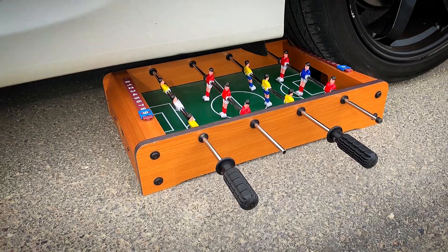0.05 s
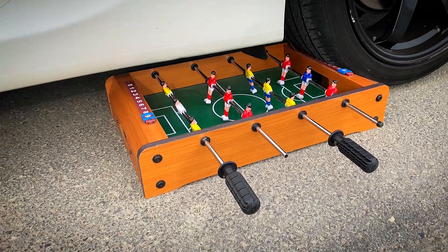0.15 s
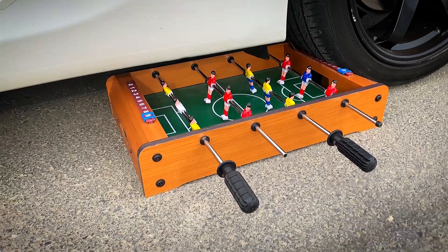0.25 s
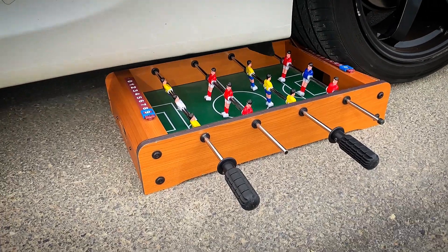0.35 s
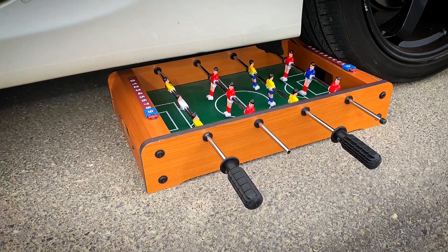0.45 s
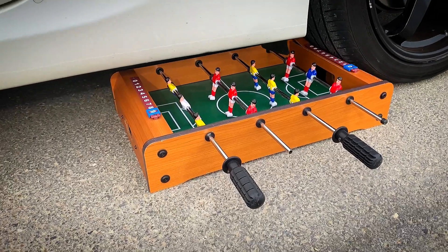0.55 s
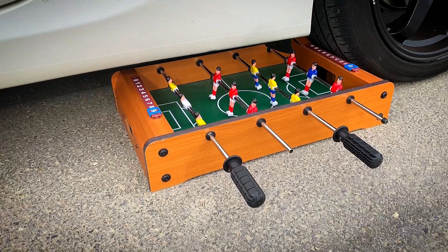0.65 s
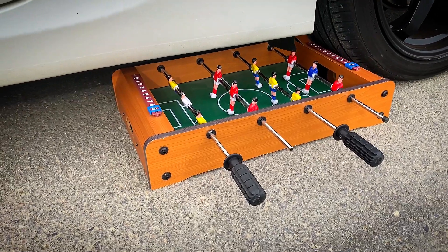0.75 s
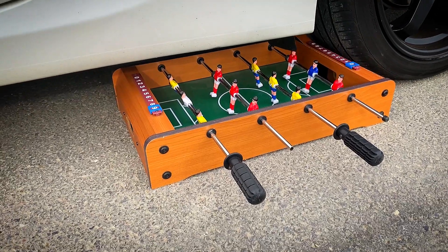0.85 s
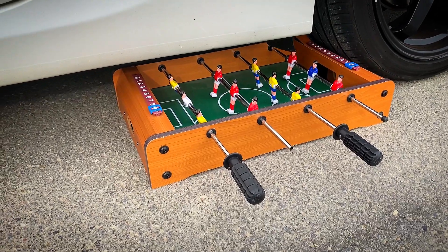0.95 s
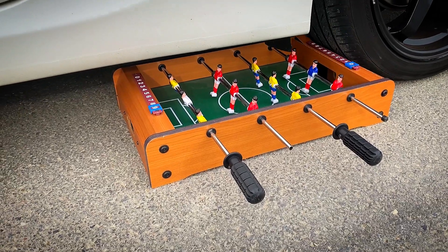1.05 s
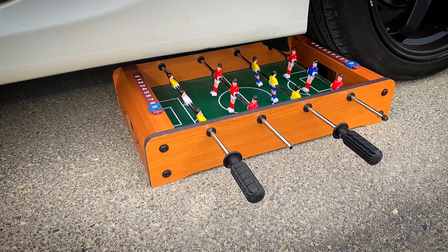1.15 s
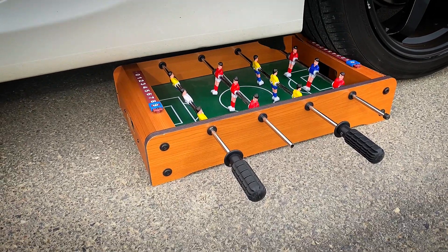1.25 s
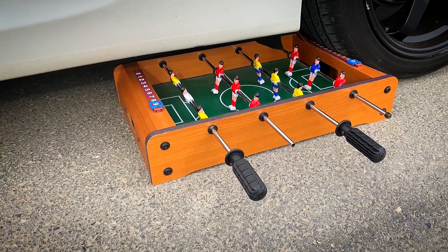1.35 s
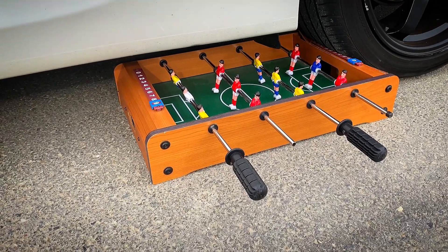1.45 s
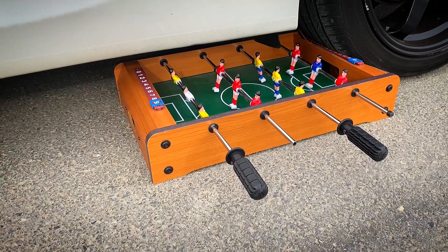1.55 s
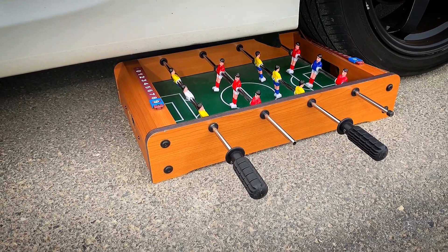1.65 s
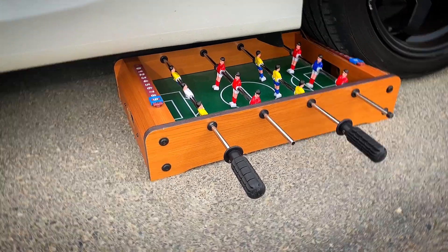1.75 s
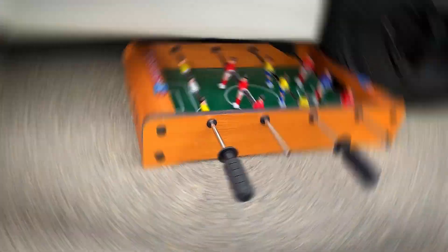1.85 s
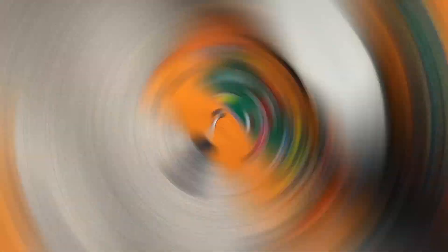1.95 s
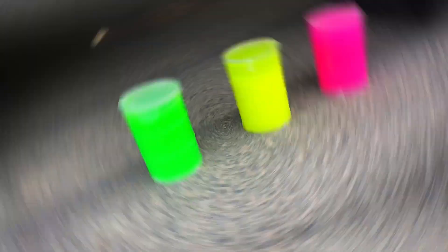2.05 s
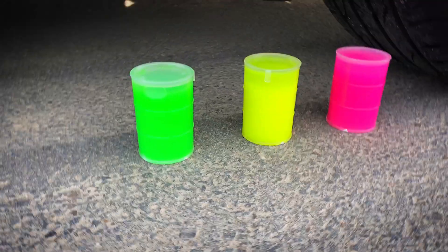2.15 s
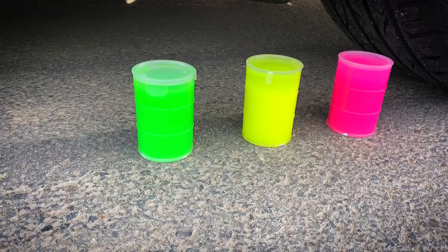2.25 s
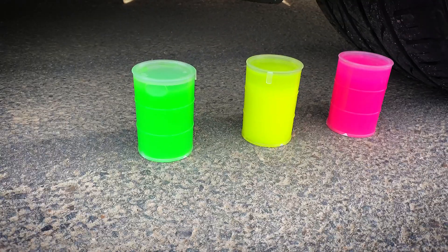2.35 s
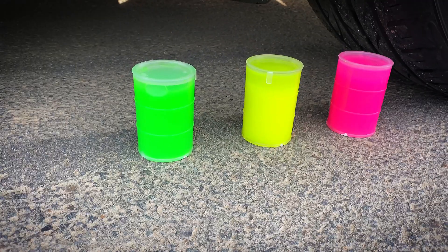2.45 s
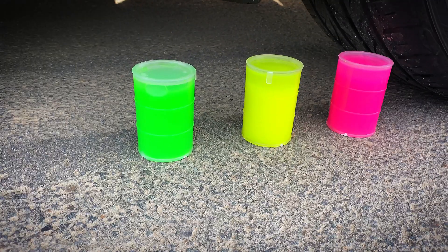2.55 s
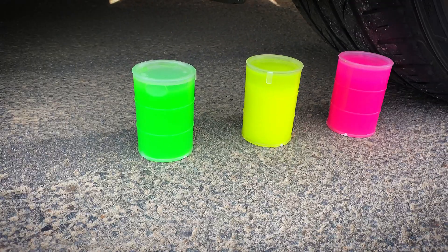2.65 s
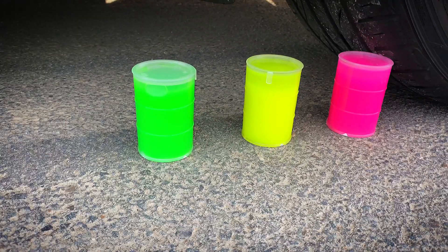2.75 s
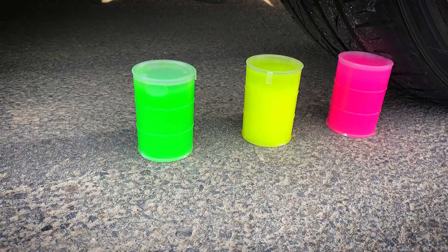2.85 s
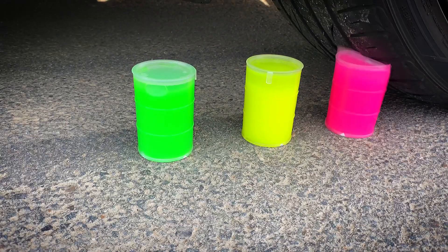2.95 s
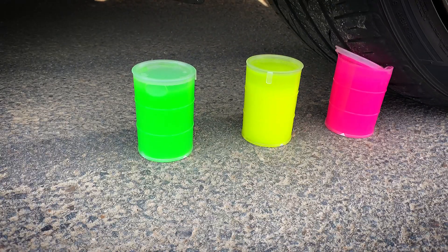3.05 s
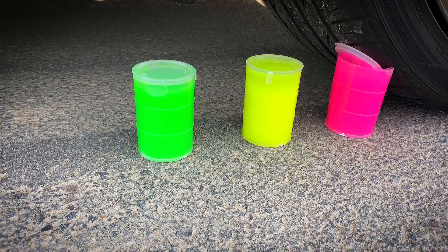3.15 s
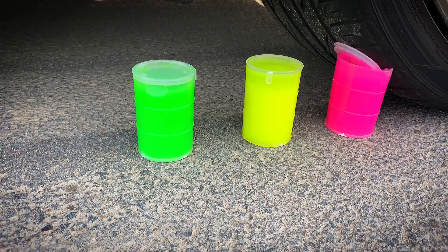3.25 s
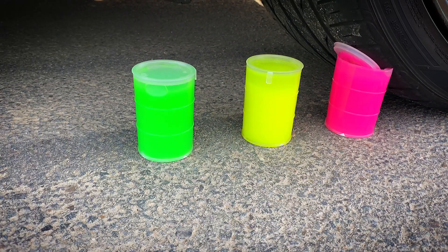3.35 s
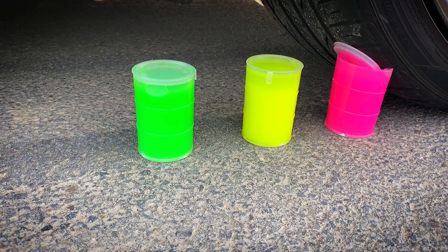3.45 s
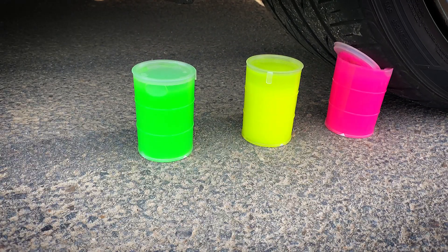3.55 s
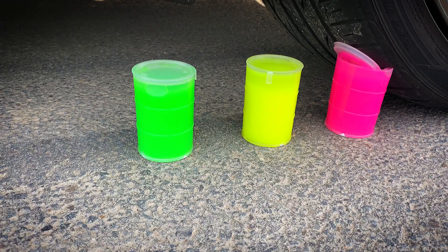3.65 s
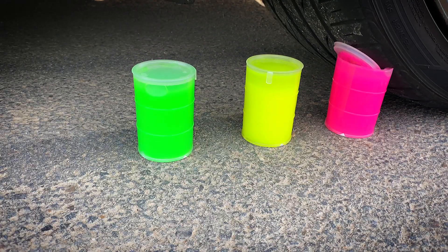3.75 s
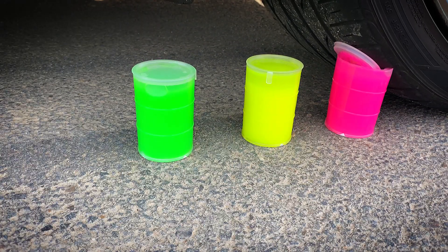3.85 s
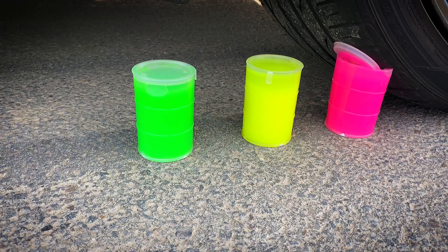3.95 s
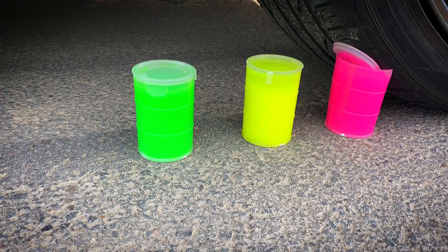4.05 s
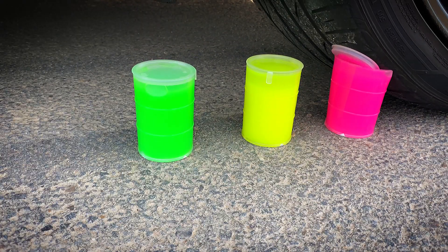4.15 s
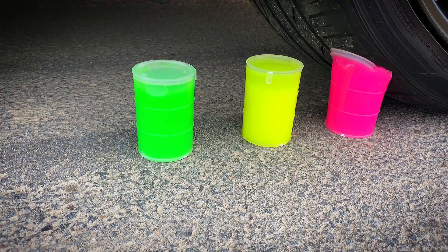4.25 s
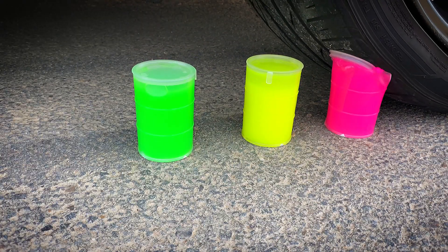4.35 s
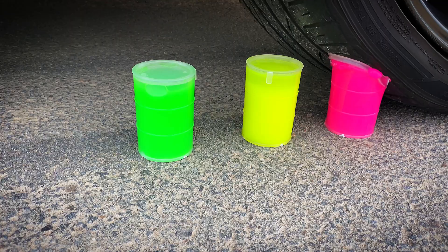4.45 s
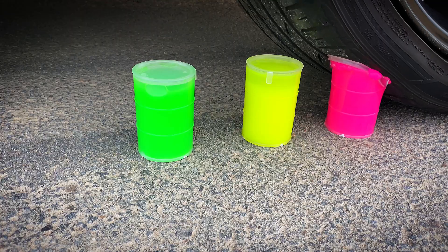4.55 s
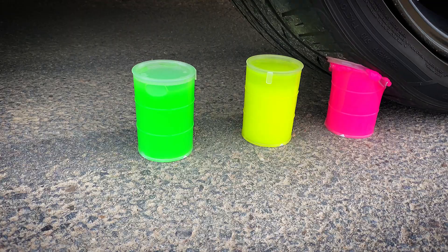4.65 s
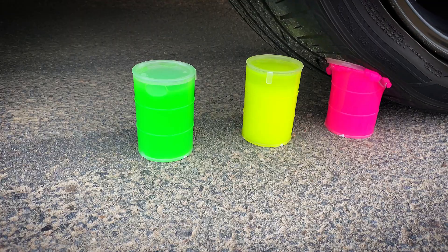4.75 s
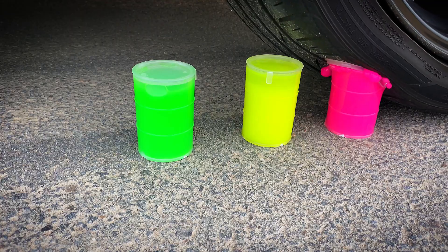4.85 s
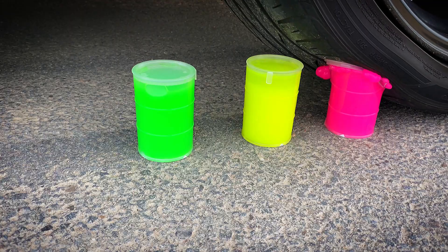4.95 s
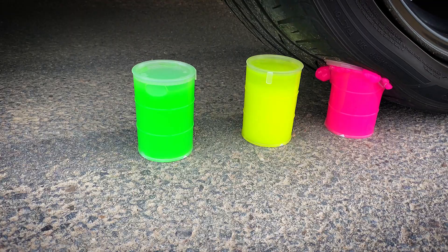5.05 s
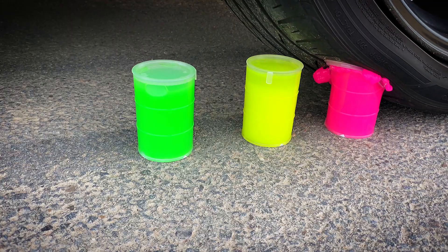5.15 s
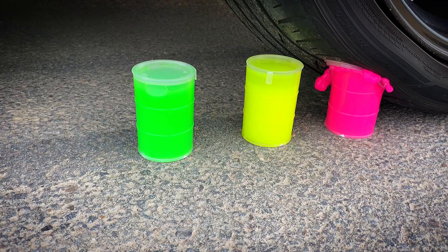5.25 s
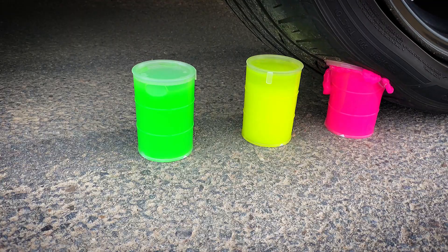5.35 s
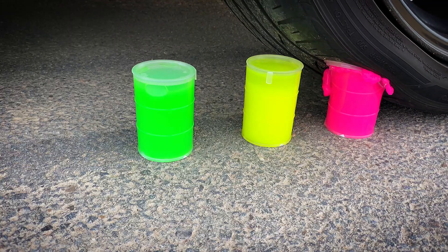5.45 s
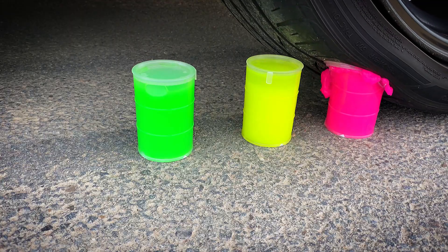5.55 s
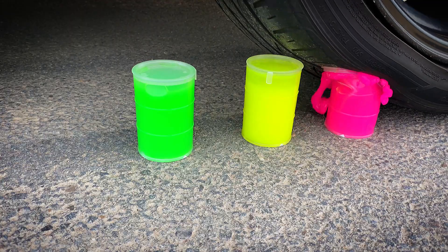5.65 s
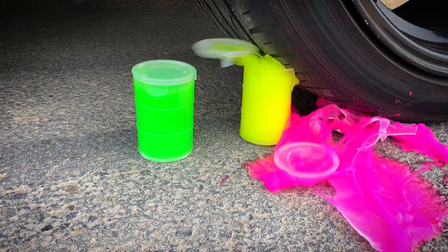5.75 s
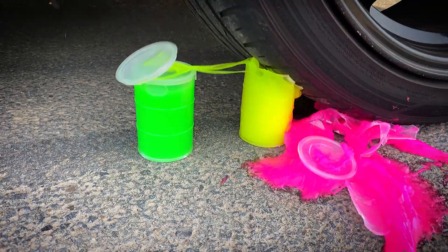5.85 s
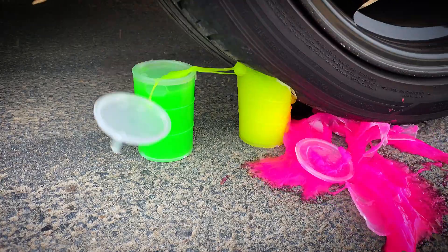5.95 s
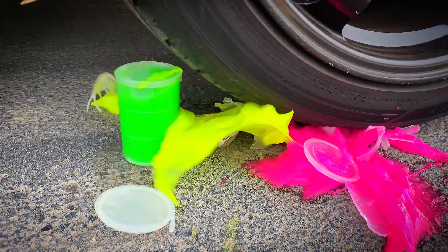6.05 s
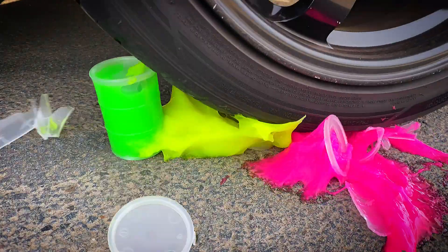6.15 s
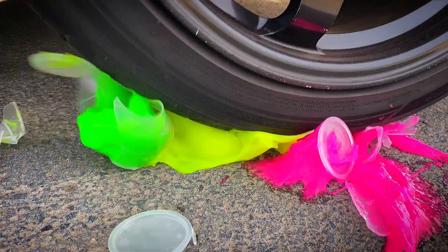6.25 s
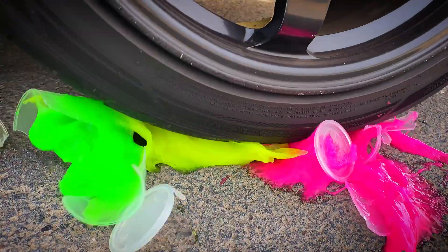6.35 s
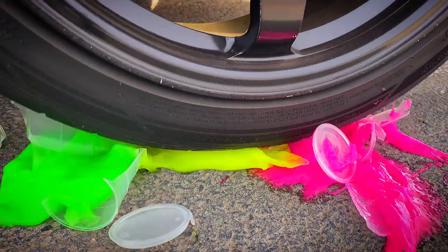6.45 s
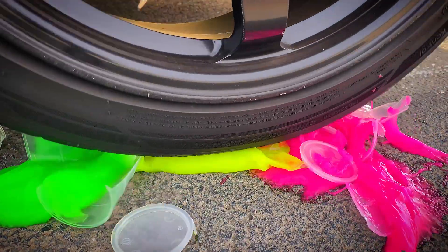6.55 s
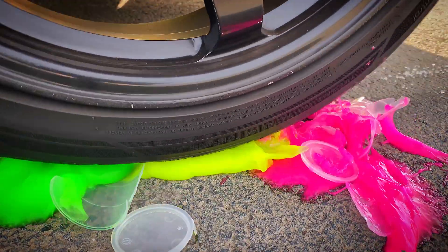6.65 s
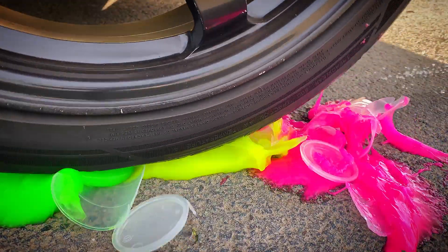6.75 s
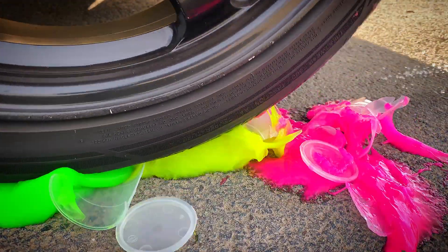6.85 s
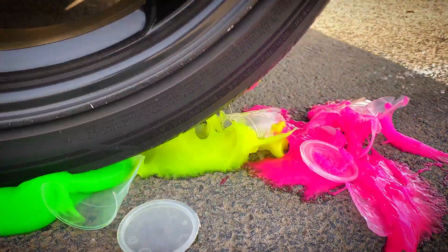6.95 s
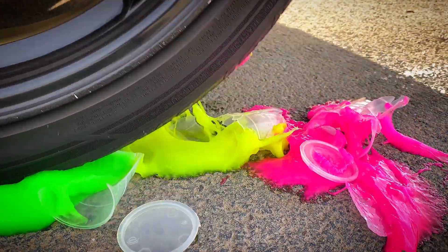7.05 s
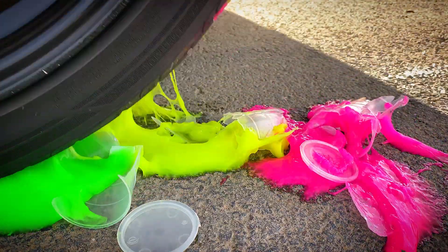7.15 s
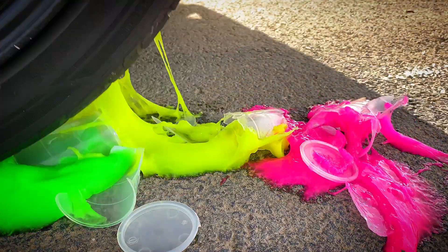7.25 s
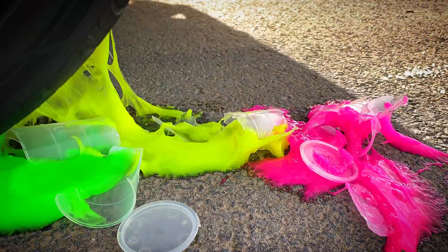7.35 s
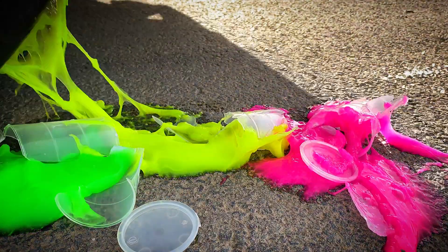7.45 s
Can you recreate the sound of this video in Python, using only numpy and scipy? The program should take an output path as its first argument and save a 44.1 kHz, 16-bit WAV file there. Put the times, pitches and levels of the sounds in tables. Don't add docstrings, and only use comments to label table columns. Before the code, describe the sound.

Very close, dry outdoor sound at asphalt level beside a car tyre. At 0 s a loud wooden crack hits over a low, throbbing idle with faint rattle and hiss; tiny ticks and a hollow knock follow until 0.5. A sharp click at 1.4 leads to another big crack at 1.5. The sound fades to nothing at 2 and rises again with a faster engine hum. Around 2.7-2.9 a plastic lid snaps and folds with a small leak. The engine revs up to about 4.1, with dull creaks at 4.2, then settles by 5. From 5.6 the first tub cracks and bursts, air slamming the microphone into clipping; the second pops hugely at 5.97, the third crunches from 6.16 to 6.6 with wet spurts. Small plastic crackles and slimy spits, mostly around 7.1, scatter over the slowing engine until an abrupt stop near 7.5.

```python
import sys
import numpy as np
from scipy import signal
from scipy.fft import rfft, irfft, next_fast_len
from scipy.io import wavfile
from scipy.ndimage import uniform_filter1d

SR = 44100
rng = np.random.default_rng(int(sys.argv[2]) if len(sys.argv) > 2 else 0)


def dump_mix(stems):
    frames = np.atleast_2d(stems).T
    limited = np.clip(frames, -1, 1)
    pcm = np.round(limited * 32767).astype(np.int16)
    wavfile.write(sys.argv[1], SR, pcm)


def volts(x):
    e = np.asarray(x, float) / 20
    return 10 ** e


N = 330309
CUT_S = 1.99
PIPE_SPREAD = 0.9


def level(x):
    return x / np.sqrt(np.mean(x ** 2))


def walk(rate):
    hold = int(SR / rate)
    steps = np.repeat(rng.standard_normal(N // hold + 1), hold)
    return 1.37 * uniform_filter1d(uniform_filter1d(steps, hold), hold)[:N]


def coloured(spectrum):
    hz, db = np.transpose(spectrum)
    size = next_fast_len(N)
    f = np.fft.rfftfreq(size, 1 / SR)
    gain = volts(np.interp(np.log(f + 1), np.log(hz), db, left=-90, right=-90))
    return level(irfft(rfft(rng.standard_normal(N), size) * gain)[:N])


def band(x, lo_hz, hi_hz):
    return signal.sosfilt(signal.butter(2, [lo_hz, min(hi_hz, 0.45 * SR)], "band", fs=SR, output="sos"), x)


def breakage(noise, ring_hz, treble_db):
    # ratio to ring_hz, level_db
    wall_modes = [(0.998, 6.5), (1.599, 0.5), (2.35, -6.5), (3.4, -25.5)]
    top_hz = np.clip(7000 * volts(0.35 * treble_db), 2600, 7000)
    shard_hz = rng.uniform(0.19, 0.9) * top_hz
    snap = level(band(noise[0], 650, top_hz))
    snap += 0.27 * level(band(noise[0], 0.9 * shard_hz, 0.97 * shard_hz))
    treble = level(band(noise[1], 5900, 14400))
    ring = 0
    for ratio, db in wall_modes:
        mode_hz = ratio * ring_hz
        ring = ring + volts(db) * level(band(noise[2], 0.792 * mode_hz, 1.18 * mode_hz))
    return level(snap), treble, level(ring)


def breaks():
    # start_s, level_db (peak), ring_hz, ring_db (over the crack), t60_s
    game = [
        (0.009, 1, 524, -3.5, 0.06),
        (0.2659, -44, 660, -20, 0.015),
        (0.3793, -21, 890, 0, 0.023),
        (0.4583, -34, 513, 22, 0.0074),
        (1.3893, -17, 4640, -3, 0.004),
        (1.4876, -9.5, 747, 2.5, 0.028),
    ]
    lid = [
        (2.7264, -28, 412, 3, 0.0063),
        (2.866, -2, 1098, 3, 0.012),
        (2.8789, -3.5, 1153, -4, 0.017),
        (2.8892, -9, 1120, 3.5, .0062),
        (2.9321, -2.5, 576, 8, .02),
        (4.1486, -33, 455.2, 18, 0.019),
        (4.202, -28.5, 447, 8, 0.019),
        (4.2268, -29.5, 396, -10, 0.023),
        (4.5714, -38.5, 1748, -2, 0.0091),
        (4.5781, -38.5, 1764, 10.5, 0.01),
    ]
    first_tub = [(5.5617, -2.5, 563, 4.5, .007), (5.5886, -10.5, 600, 12.5, .0088),
                 (5.6104, -7, 600, 9.5, .005), (5.6678, -17.5, 1124, 10, .0044), (5.6763, 9, 354, 5.5, .04),
                 (5.6869, 5, 844, 6.5, .018), (5.6929, 1.5, 700, -11, .0059), (5.7092, 8, 893, 10.5, .0091),
                 (5.7198, -2, 730, -3, 0.0061), (5.761, -2.5, 653, -7, .025),
                 (5.7802, -25.5, 660, -11, .029), (5.8032, -21.5, 896, -9, .019),
                 (5.8199, 5, 1036, 2.5, .004), (5.8413, -16.5, 2263, -3.5, .0077),
                 (5.8637, -24.5, 400, 10.5, .0088), (5.8715, -19.5, 1050, 2, .012)]
    second_tub = [(5.9338, -25.5, 1366, 18, 0.016), (5.9381, -18.5, 1674, 4.5, 0.016),
                  (5.966, 23.5, 830, 1, 0.0088), (5.9823, 14.5, 443, 6.5, 0.0046),
                  (5.9916, -15.5, 400, 7, 0.049), (6.0019, -22, 660, -1, 0.025),
                  (6.0358, -24.5, 2240, 11.5, 0.007), (6.0447, -20, 1437, 7, 0.043),
                  (6.0987, -22, 1796, -2, .018), (6.1129, -25, 2230, -10, .0071),
                  (6.143, -30, 894, 6, 0.0098)]
    third_tub = [(6.1645, 0.5, 888, 0.5, 0.055), (6.196, 4.1, 660, -9.5, 0.03),
                 (6.2356, -5.7, 957, -0.5, 0.022), (6.252, -8.5, 2200, -7.5, 0.0055),
                 (6.2624, 3.5, 1160, 2.5, 0.0049), (6.2913, -12.5, 742.7, 1.5, 0.0083),
                 (6.335, -33, 2500, -3, .006), (6.307, -17, 1157, -6.5, 0.018),
                 (6.3505, -16, 1640, 12.5, 0.0035), (6.3815, -18, 1941, -16, .012),
                 (6.3904, -1, 1340, 2, 0.014), (6.4227, -30, 1964, 24.5, 0.003),
                 (6.4396, -19, 1890, 16.5, .0056), (6.4465, -24, 1334, -0.5, .032),
                 (6.4579, -10, 1323, 9.5, 0.013), (6.4788, -22.5, 886, 8, 0.02),
                 (6.496, -23, 1250, 13.5, .0074), (6.51, -3.5, 1128, -5, 0.03),
                 (6.5355, -1.1, 1210, 10.5, 0.0034), (6.5644, -24, 1850, 0, 0.0038),
                 (6.5793, -15, 1890, -0.8, 0.0044)]
    shards = [(6.6552, -21.5, 2300, 5.5, 0.0092), (6.6683, -31, 2000, -4.7, .076),
              (6.703, -20, 2570, -20, 0.0045), (6.7095, -33.5, 1310, 12, 0.02),
              (6.7298, -30.5, 1180, 1, .008), (6.7556, -26.5, 980, -5.5, 0.018),
              (6.803, -20.5, 2330, -24, 0.0087), (6.8238, -34.5, 2252, -11, 0.012),
              (6.8294, -37, 463, 14.5, 0.017), (6.841, -27, 600, -10, 0.02), (6.8824, -25, 2140, -21, 0.02),
              (6.992, -35, 2110, 6, .011), (6.9503, -38, 440, 1.2, .012), (7.0024, -37, 1320, 9.5, 0.014),
              (7.055, -42, 1205, 24, 0.031), (7.061, -27.5, 910, 16, 0.044), (7.068, -22, 1190, 4, .0044),
              (7.077, -29, 1670, 9, 0.013), (7.153, -22, 482, 16.5, 0.017),
              (7.177, -30.5, 660, 16.5, 0.015), (7.2114, -33.5, 1302, 10.5, 0.013),
              (7.277, -53, 7000, 16.5, .006), (7.3379, -55, 7040, 17, .006)]
    # breaks, treble_db over the crack, treble lost per dB of ring, treble lost per dB of weakness
    materials = [(game, -7.5, 0.35, 0.034), (lid, -5, 0.2, 0.05), (first_tub, -0.027, 0.05, 0.05),
                 (second_tub, -2.5, 0.3, 0.05), (third_tub, -8, 0.8, 0.42), (shards, -10.5, 0.13, 0.045)]
    found = []
    for rows, base_db, lost, won in materials:
        for start_s, db, ring_hz, ring_db, t60_s in rows:
            treble_db = base_db - lost * ring_db + won * min(db, 0)
            found.append((start_s, db, ring_hz, ring_db, t60_s, treble_db))
    return found


def cracks():
    out = np.zeros(N + SR)
    t = np.arange(SR // 8) / SR
    slump_s = 0.02
    sliding_hz = 150 + (400 - 150) * np.exp(-t / slump_s)
    slump = np.sin(2 * np.pi * np.cumsum(sliding_hz) / SR) * np.exp(-t / slump_s)
    tyre_hz, tyre_t60_s = 222, 0.12
    tyre_ring = np.sin(2 * np.pi * tyre_hz * t) * np.exp(-np.log(1000) * t / tyre_t60_s)
    for start_s, db, ring_hz, ring_db, t60_s, treble_db in breaks():
        noise = rng.standard_normal((5, len(t)))
        snap, treble, ring = breakage(noise, ring_hz, treble_db)
        fall = np.log(1000) * t / np.clip(t60_s, 0.004, 0.12)
        splinters = volts(7.4 * uniform_filter1d(noise[3], 30) * np.minimum(t / 0.009, 1))
        decay = np.exp(-fall) + np.exp(-t / 0.00049) + volts(-41) * np.exp(-0.3 * fall)
        bright = (snap + volts(treble_db) * treble * np.exp(-0.6 * fall)) * splinters * decay
        thud = volts(-6.5 + 0.23 * db) * level(band(noise[4], 140, 480))
        swell = 1 - np.exp(-t / 0.00026)
        hollow = (ring + thud) * volts(ring_db - 0.1) * np.exp(-0.65 * fall) * swell
        low = volts(-18 + 0.84 * min(db, 0)) * tyre_ring
        if db > 5:
            low = low + volts(-24.5) * slump
        i = int(start_s * SR)
        out[i:i + len(t)] += volts(db - 1.0) * (bright + hollow + low * (start_s > CUT_S))
    return out[:N]


def squirts():
    # start_s, length_s, level_db, ring_hz, ring_db (over the squirt)
    spurts = [
        (2.89, .045, -36.5, 990, -0.5),
        (5.777, 0.022, -39.5, 907, 0),
        (5.813, 0.021, -29.5, 885, -13.5),
        (5.911, 0.037, -29.5, 1680, -18),
        (6.19, .016, -21.5, 777, 7.5),
        (7.079, .026, -48.5, 1060, 26),
        (7.106, 0.011, -27, 1364, 12),
        (7.11, 0.0076, -34.5, 1020, 16),
        (7.145, 0.017, -27, 835, 10.5),
    ]
    out = np.zeros(N + SR)
    treble_db = 2.6
    for start_s, length_s, db, ring_hz, ring_db in spurts:
        i, count = int(start_s * SR), int(length_s * SR)
        snap, treble, ring = breakage(rng.standard_normal((3, SR // 8)), ring_hz, treble_db - 7.5)
        spray = snap + volts(treble_db) * treble + volts(ring_db) * ring
        out[i:i + count] += volts(db) * signal.windows.tukey(count, 0.6) * spray[:count]
    return out[:N]


def underbody(x, t60_s=0.071, wet_db=-18):
    bounce_s, bounce = 0.000242, 0.13
    x = x + bounce * np.interp(np.arange(N) - bounce_s * SR, np.arange(N), x)
    t = np.arange(SR // 4) / SR
    tail = band(rng.standard_normal(len(t)), 340, 3600)
    tail = tail * np.exp(-np.log(1000) * t / t60_s) * (t > 0.003)
    return x + volts(wet_db) * signal.fftconvolve(x, tail / np.sqrt(np.sum(tail ** 2)))[:N]


def controls():
    idle_drive = [
        (0.12, 26.05, 0.5),
        (0.58, 24.96, -1),
        (1.45, 25.3, -1.2),
        (1.99, 25.67, 2.5),
    ]
    creep_drive = [(1.99, 35.27, 0.5), (2.571, 40.57, -2.5), (3.55, 42.16, -2.5), (3.671, 41.4, 0.5),
                   (3.81, 46.4, 4), (3.98, 55.24, 6.5), (4.122, 59.35, 2.5), (4.3, 57.38, -1.6),
                   (4.6, 46.1, -1.3), (4.77, 39.5, -4.5), (4.94, 33.38, 0), (5.099, 32.62, 2.5),
                   (5.618, 39.3, 3.5), (5.999, 41.96, 3), (6.396, 39.74, -1.5), (6.619, 35.2, -3.5),
                   (6.992, 29.39, -3.5), (7.49, 24.2, -7)]
    # order, idle_db, creep_db (over the pipe), dB gained per dB of load
    main_orders = [(1, -34.5, 3.6, 0.65), (2, -45, 0.25, 1.44), (3, -33.5, -1.1, 1.61), (4, -25.5, -0.4, 2)]
    # pitch_hz, level_db
    tailpipe = [(28, -46), (44, -26.5), (60, -30), (82, -13.5), (120, -27.5), (145, -24), (175, -27),
                (240, -54.5)]
    t = np.arange(N) / SR
    idle = t < CUT_S

    def follow(drive):
        start_s, firing_hz, load_db = np.transpose(drive)
        return np.array([np.interp(t, start_s, firing_hz), np.interp(t, start_s, load_db)])

    hz, load = np.where(idle, follow(idle_drive), follow(creep_drive))
    pipe_hz, pipe_db = np.transpose(tailpipe)
    order_db = []
    for k, (_, idle_db, creep_db, share) in enumerate(main_orders, 1):
        boom_db = np.interp(np.log(k * hz), np.log(pipe_hz), pipe_db)
        order_db.append(np.where(idle, idle_db, creep_db + boom_db) + share * load)
    octaves = np.log2(hz / 40)
    revving = np.clip(uniform_filter1d(np.gradient(hz) * SR, SR // 10), 0, None)
    rattle_db = np.where(idle, -51.5, -45.5 + 8 * octaves + 0.1 * revving) + 0.6 * load
    hiss_db = np.where(idle, -53, -47.5 + 9 * octaves) + 0.1 * load
    return hz, order_db, rattle_db, hiss_db, idle


def exhaust(hz, order_db, idle):
    # order, idle_db, creep_db (both over order 4)
    weak_orders = [(3.5, -31, -16), (4.5, -38, -8.5), (5, -16, -2.5), (5.5, -31.5, -10.5), (6, -16, -3.5),
                   (6.5, -23, -37), (7, -10.5, -49.5), (7.5, -18, -21), (8, -8, -13)]
    silencer_hz = 179.8
    turn = 2 * np.pi * np.cumsum(hz) / SR + np.where(idle, 0.0, 1.3)
    tones = np.zeros(N)
    for k, db in enumerate(order_db, 1):
        tones += volts(db + 0.8 * walk(12)) * np.cos(k * turn - PIPE_SPREAD * k ** 2)
    for order, idle_db, creep_db in weak_orders:
        edge = 1 / (1 + (order * hz / silencer_hz) ** 16)
        db = order_db[3] + np.where(idle, idle_db, creep_db) + 4.3 * walk(7.9)
        tones += volts(db) * edge * np.cos(order * turn - PIPE_SPREAD * order ** 2)
    scatter = level(band(rng.standard_normal(N), 88, 170))
    scatter += 1.4 * level(band(rng.standard_normal(N), 72, 92))
    scatter_db = np.max(order_db, axis=0) - 19.5 + 2.9 * walk(18)
    return np.sqrt(2) * tones + scatter * volts(scatter_db), turn


def growl(hz, turn, rattle_db, idle):
    box_hz, box_width_hz = 400, 61
    lines = np.zeros(N)
    for k in range(7, 13):
        resonance = 1 / (1 + ((k * hz - box_hz) / box_width_hz) ** 2)
        lines += volts(4.5 * walk(14)) * np.cos(k * turn - PIPE_SPREAD * k) * resonance
    return lines * volts(rattle_db - 6) * ~idle


def engine_bay(turn, rattle_db, hiss_db, idle):
    # pitch_hz, level_db (per Hz)
    rattle_colour = [(120, -13), (210, -2), (295, -13), (351, -5), (423, -3), (590, -11), (650, -5.5),
                     (726, -13.5), (1010, -20.5), (1100, -21), (1430, -46.5), (2420, -120)]
    hiss_idle = [(590, -25), (1000, -4.5), (1540, -3.5), (1770, 0.5), (2710, -11.5), (3190, -12),
                 (4070, -14), (9060, -17), (9940, -25.5), (14900, -28.5), (16000, -23.5)]
    hiss_creep = [(590, -9), (1000, -2), (1100, 3), (1500, -4.5), (1670, 2.5), (1870, -0.5), (2620, -6.5),
                  (3580, -6), (3930, -9.5), (8850, -13), (10700, -24), (14600, -21), (16000, -29)]
    # pitch_hz, width_hz, idle_db, creep_db (both over the hiss)
    ringing_parts = [(3200, 200, -12, -24), (8800, 300, -21, -28), (660, 67, -23, -16.5),
                     (1398, 45, -22, -15.5), (1630, 150, -26.5, -11.5)]
    knock = 1 + np.clip(volts(rattle_db + 28.0), 0.1, 0.9) * np.cos(turn + 1.1)
    rattle = knock * coloured(rattle_colour) * volts(rattle_db + 2.5 + 0.69 * walk(16))
    hiss = np.where(idle, coloured(hiss_idle), coloured(hiss_creep))
    hiss = hiss * volts(0.2 * walk(11)) * (1 + 0.12 * np.cos(turn))
    for hz, width_hz, idle_db, creep_db in ringing_parts:
        tick = level(band(rng.standard_normal(N), hz - width_hz / 2, hz + width_hz / 2))
        hiss += volts(np.where(idle, idle_db, creep_db) + 4.0 * walk(38) + 2.5 * walk(1.3)) * tick
    return rattle + hiss * volts(hiss_db + 1.2)


def air():
    # start_s, push (1 = the microphone's limit, minus = outward), length_s
    jets = [
        (5.672, -3.0, 0.075),
        (5.962, 1.35, 0.049),
    ]
    t = np.arange(N) / SR
    wind = level(band(rng.standard_normal(N), 2.6, 4.5)) * volts(-23.5 + 0.5 * walk(1.5))
    flutter_db = np.where(t < CUT_S, -40, -47) + 3 * walk(4.6)
    out = wind + level(band(rng.standard_normal(N), 14, 34)) * volts(flutter_db)
    for start_s, push, length_s in jets:
        u = np.clip((t - start_s) / length_s, 0, None)
        out += push * (1 - np.exp(-90 * u)) * np.exp(-u ** 1.3)
    return out


def scene():
    hz, order_db, rattle_db, hiss_db, idle = controls()
    toys = underbody(cracks() + squirts())
    hum, turn = exhaust(hz, order_db, idle)
    engine = hum + growl(hz, turn, rattle_db, idle) + engine_bay(turn, rattle_db, hiss_db, idle)
    return (toys + engine + air())[None]


def splice():
    t = np.arange(N) / SR
    fade_out_s, fade_in_s = 0.46, 0.49
    fade = np.abs(t - CUT_S) / np.where(t < CUT_S, fade_out_s, fade_in_s)
    return np.clip(fade, 0, 1) ** 1.07 * np.clip((t[-1] - t) / 0.0061, 0, 1)


def low_pass(x):
    return signal.sosfilt(signal.butter(12, 16500, fs=SR, output="sos"), x)


def record(dry):
    capsule = np.clip(dry, -1.02, 0.95)
    coupled = signal.lfilter(*signal.butter(1, 1.2, "high", fs=SR), capsule)
    converted = np.clip(coupled, -1.01, 0.9)
    dulled = signal.sosfilt(signal.cheby2(10, 60, 17000, fs=SR, output="sos"), converted)
    return low_pass(dulled * splice())


dry = scene()
out = record(dry)
dump_mix(out)
```